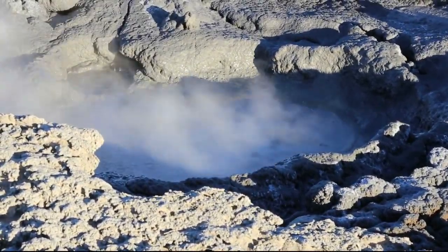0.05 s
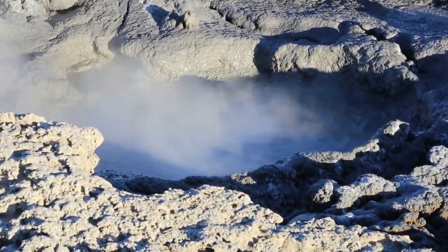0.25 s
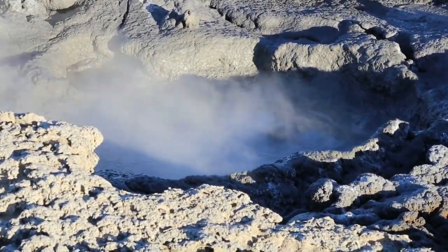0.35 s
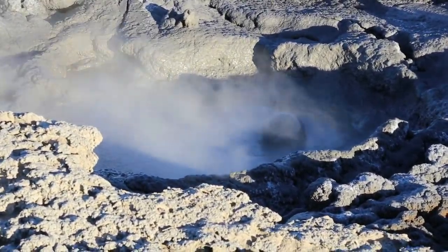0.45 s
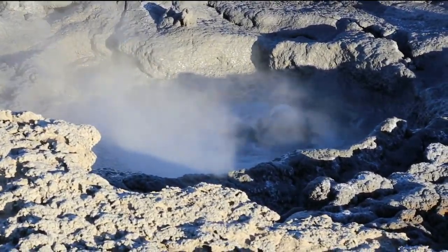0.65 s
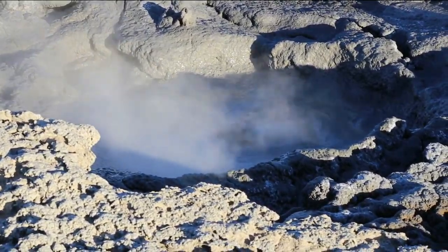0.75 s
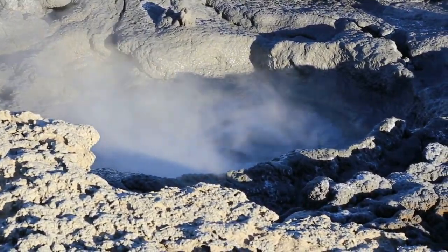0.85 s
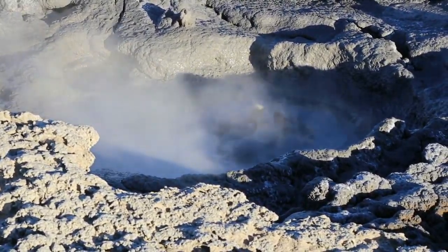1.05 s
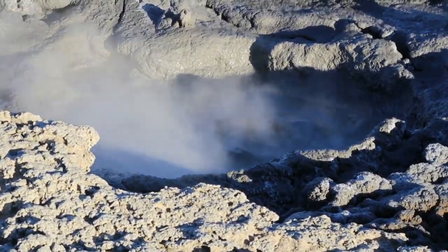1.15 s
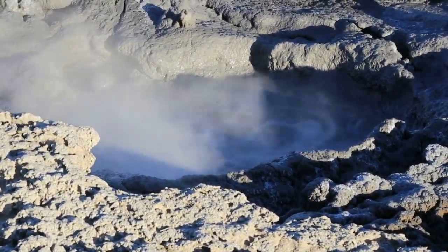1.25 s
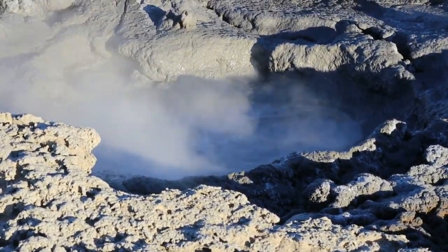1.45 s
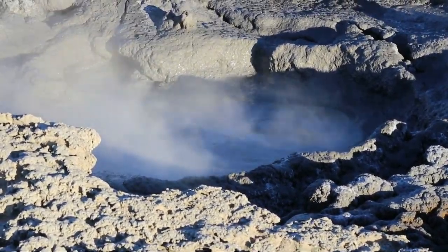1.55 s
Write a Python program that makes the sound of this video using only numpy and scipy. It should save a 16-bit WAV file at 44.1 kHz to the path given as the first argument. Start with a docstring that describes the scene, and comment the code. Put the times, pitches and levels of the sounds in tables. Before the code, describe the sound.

Thick mud bubbling with irregular plops and wet pops over steady rushing steam.

```python
"""Thick mud churns and simmers in a rocky outdoor pit, over rushing steam and a little wind rumble.
Small bubbles snap open as their films tear, with wet ticks that echo off the pit walls.
Large gas pockets glug under the surface, their pitch rising as they near it.
Thrown mud spatters back, and tearing films crackle with fine spray."""
import sys
import numpy as np
from scipy import signal
from scipy.fft import rfft, irfft
from scipy.io import wavfile

SR = 44100
rng = np.random.default_rng(int(sys.argv[2]) if len(sys.argv) > 2 else 0)


def pcm_store(signal):
    """Save signal as 16-bit PCM."""
    levels = np.round(np.clip(np.atleast_2d(signal), -1, 1) * 32767)
    wavfile.write(sys.argv[1], SR, levels.astype(np.int16).T)


N = 70560
T = np.arange(N) / SR
BUBBLE_RISE_PER_S = 2.8  # relative pitch rise of a surfacing bubble


def from_db(db):
    """Decibels to gain."""
    return 10 ** (np.asarray(db) / 20)


def level(curve):
    """Gain over time from (time [s], level [dB]) points."""
    return from_db(np.interp(T, *np.transpose(curve)))


def rms_one(x):
    """Scale to rms 1."""
    return x / np.sqrt(np.mean(x ** 2) + 1e-20)


def add(out, start_s, sound):
    """Mix a sound in at start_s."""
    i = int(np.clip(start_s * SR, 0, N - 1))
    out[i:i + len(sound)] += sound[:N - i]


def band(x, low_hz, high_hz, order=2):
    """Butterworth band-pass."""
    return signal.sosfilt(signal.butter(order, [low_hz, high_hz], "band", fs=SR, output="sos"), x)


def drift(rate_hz):
    """Slow random wander, rms 1."""
    hz = np.arange(N // 2 + 1) * SR / N
    return rms_one(irfft(rfft(rng.standard_normal(N)) / (1 + (hz / rate_hz) ** 2), N))


def bubble(hz, swell_s, t60_s):
    """A gas cavity swells into a ring and decays while its pitch rises."""
    t = T[:SR // 4]
    envelope = (1 - np.exp(-(t / swell_s) ** 2)) * from_db(-60 * t / t60_s)
    return envelope * np.sin(2 * np.pi * hz * t * (1 + BUBBLE_RISE_PER_S * t / 2))


def swarm(per_s, range_hz, t60_cycles, spread_db, tilt_db, pitches=18):
    """Random bubbles of uneven strength on log-spaced pitches, tilted from low to high; rms 1."""
    strengths = from_db(spread_db * np.minimum(rng.exponential(1, N), 4))
    signs = rng.choice([-1, 1], N)
    births = rng.random(N) < per_s / SR
    kicks = strengths * signs * births
    pitch_index = rng.integers(0, pitches, N)
    out = np.zeros(N)
    for k, hz in enumerate(np.geomspace(*range_hz, pitches)):
        ring = bubble(hz, swell_s=0.88 / hz, t60_s=t60_cycles / hz)
        out += from_db(tilt_db * k / pitches) * signal.fftconvolve(kicks * (pitch_index == k), ring)[:N]
    return rms_one(out)


def pool():
    """Large bubbles churn deep down; small ones simmer all over the pool."""
    churn = swarm(per_s=560, range_hz=(116.3, 319.6), t60_cycles=11.6, spread_db=0.5, tilt_db=10.5)
    simmer = swarm(per_s=800, range_hz=(475, 1600), t60_cycles=6.5, spread_db=4, tilt_db=-3)
    return from_db(-47) * churn + from_db(-51.5) * simmer


def spatter():
    """Thrown mud falls back, ringing as tiny bubbles."""
    # spatter after the bursts: (time [s], level [dB])
    surges = [(0, -51), (.1, -50), (.19, -51), (.31, -49), (.41, -48), (.47, -52.5), (.61, -51), (.70, -43),
              (.80, -45.5), (.90, -52), (1.19, -51.5), (1.26, -46.5), (1.34, -52), (1.6, -55)]
    drops = swarm(per_s=3500, range_hz=(1125, 4600), t60_cycles=5.1, spread_db=3.5, tilt_db=1)
    return level(surges) * band(drops, low_hz=475, high_hz=5250, order=6)


def steam_and_wind():
    """Dull noise bands flicker independently under a smooth hiss; gusts swell the lowest."""
    # steam and wind spectrum: (frequency [Hz], relative density [dB])
    spectrum = [(25, -50), (50, -12.5), (85, -3), (150, -1), (230, 1), (410, -8), (610, -5.5), (900, -13),
                (1400, -22.5), (2200, -25), (3600, -29.5), (5100, -28.5), (5800, -36), (7100, -41),
                (12200, -38.5), (16000, -43.5)]
    # gusts in the wind rumble: (time [s], gain [dB])
    gusts = [(0, 5), (.2, -6.5), (.37, 1.5), (.45, -0.5), (.75, 2), (1.1, 0.5), (1.35, 4), (1.6, 1.5)]
    flicker_db, wind_top_hz = 1.14, 160
    edges_hz = [12, 80, 160, 320, 640, 1280, 2560, 5120]
    hz = np.arange(N // 2 + 1) * SR / N + 1
    knots_hz, knots_db = np.transpose(spectrum)
    shape = from_db(np.interp(np.log(hz), np.log(knots_hz), knots_db))
    noise_bins = rfft(rng.standard_normal(N)) * shape
    out = irfft(noise_bins * (hz >= edges_hz[-1]), N)  # smooth hiss
    for low_hz, high_hz in zip(edges_hz, edges_hz[1:]):
        flicker = from_db(flicker_db * drift(rate_hz=13))
        gust = level(gusts) if high_hz <= wind_top_hz else 1
        out += irfft(noise_bins * (hz >= low_hz) * (hz < high_hz), N) * flicker * gust
    return from_db(-42) * rms_one(out)


def pops():
    """A bubble's film tears; as the hole widens, the pitch shoots up and the ring dies ever faster."""
    # bubbles snapping open: (time [s], pitch [Hz], level [dB], life to -60 dB [cycles])
    bursts = [(0.0093, 2010, -30.5, 4.8), (0.0335, 2680, -33.5, 9.7), (0.0335, 925, -30, 3.8),
              (.098, 590, -33, 7.8), (.1425, 1300, -33, 5.7), (0.222, 1360, -30.5, 3.4),
              (.3385, 1060, -35, 10), (.338, 583, -30.5, 3.8), (0.3392, 2720, -33.5, 17),
              (0.3978, 680, -26, 3.9), (.4035, 1090, -24, 2.5), (0.4091, 750, -30.5, 8.8),
              (0.434, 2840, -26.5, 10), (0.434, 4050, -33.5, 16), (.4330, 584, -29, 4.4),
              (0.5931, 2440, -24.5, 3.2), (0.6388, 1600, -30, 16), (0.6398, 2160, -25.5, 19.6),
              (.6402, 3070, -25.5, 8.8), (.6665, 630, -27, 4.9), (0.694, 620, -33, 7),
              (0.7562, 3260, -28, 7.2), (0.7575, 570, -24, 5.8), (0.7589, 1320, -22.5, 4.7),
              (0.7736, 2650, -21, 3), (.7769, 2220, -13.5, 5.5), (.7800, 587, -26.5, 4),
              (0.781, 4600, -22, 6.9), (0.8032, 1980, -22, 3.5), (.8034, 1720, -20.5, 5.6),
              (0.819, 1730, -33, 11), (.8805, 3000, -35, 6), (0.9862, 1280, -33.5, 6.5),
              (0.9952, 940, -42, 7), (.9970, 573, -32.5, 7.7), (1.1050, 670, -31.5, 6),
              (1.1718, 2258, -3, 7.5), (1.2080, 930, -24.5, 4.6), (1.241, 1020, -34, 11),
              (1.271, 2360, -34.5, 22), (1.3129, 2940, -32, 3.6), (1.4099, 800, -29, 2.4),
              (1.445, 550, -32.5, 3.9), (1.5258, 780, -33.5, 9.5), (1.5377, 2710, -28.5, 3.1)]
    open_cycles, torn_cycles, rise_per_life = 0.36, 9.6, 0.9
    out, t = np.zeros(N), T[:SR // 20]
    for start_s, hz, db, life_cycles in bursts:
        age = t * hz / life_cycles
        envelope = (1 - np.exp(-(t * hz / open_cycles) ** 2)) * from_db(-60 * age ** 2)
        rise = rise_per_life * min(1, torn_cycles / life_cycles) ** 2  # long rings tear and rise less
        pitch_hz = hz * (1 + rise * (np.minimum(age, 1) - 1 / 4))
        add(out, start_s, from_db(db) * envelope * np.sin(2 * np.pi * np.cumsum(pitch_hz) / SR))
    return out


def pit(x):
    """Direct sound, close wall reflections and a short, faint scatter off rough rock."""
    # wall reflections: (delay [s], gain [dB])
    walls = [(.0019, -19.5), (.00327, -12.5), (.00528, -13.5), (.00624, -17.5), (.00671, -15), (0.01, -16)]
    scatter_db, scatter_t60_s = -25, 0.27
    out, t = x.copy(), T[:SR // 4]
    for delay_s, db in walls:
        out += from_db(db) * np.interp(T - delay_s, T, x, left=0)
    scatter = rng.standard_normal(len(t)) * from_db(-60 * t / scatter_t60_s)
    return out + from_db(scatter_db) * signal.fftconvolve(x, scatter / np.linalg.norm(scatter))[:N]


def glugs():
    """Large pockets swell into a low ring that the mud soon damps; pitch rises as they surface."""
    # gas pockets: (time [s], pitch [Hz], peak [dB], swell [s])
    pockets = [(0.047, 112, -42, 0.012), (0.226, 193, -26.5, 0.017), (0.261, 231, -35, .013),
               (.287, 227, -20, .013), (.303, 305, -34.5, 0.014), (.393, 194, -37, 0.017),
               (.416, 135, -31.5, 0.012), (0.445, 177, -26, 0.0051), (.481, 224, -28, 0.005),
               (.500, 198, -39.5, .018), (.756, 336, -24, 0.0034), (.7775, 238, -24.5, .0105),
               (0.968, 310, -33.5, 0.0066), (1, 200.7, -37.5, 0.015), (1.086, 223.5, -34.5, 0.019),
               (1.114, 199, -33, 0.019), (1.258, 185, -33.5, .011), (1.298, 208.4, -35.5, 0.015),
               (1.415, 258, -31.5, 0.0038), (1.439, 233, -34.5, .01)]
    out, t = np.zeros(N), T[:SR // 8]
    for start_s, hz, peak_db, swell_s in pockets:
        swell = (t / swell_s) ** 2
        envelope = from_db(peak_db) * swell * np.exp(1 - swell)
        add(out, start_s, envelope * np.sin(2 * np.pi * hz * t * (1 + BUBBLE_RISE_PER_S * t / 2)))
    return out


def ticks():
    """A film tears or a drop lands: a tiny, bright noise burst."""
    # wet ticks: (time [s], level [dB], band centre [Hz], t60 [s])
    tears = [(0.222, -41, 3100, 0.028), (0.4084, -39.5, 3140, 0.017), (.428, -46, 3530, .04),
             (0.6665, -36.5, 3200, 0.014), (0.688, -56, 8000, 0.038), (0.7123, -31, 3860, 0.003),
             (0.714, -48, 9100, 0.0077), (0.7358, -42, 6200, 0.0018), (.7488, -41, 6500, 0.0015),
             (.7805, -46, 7200, 0.004), (.846, -34, 3100, 0.0022), (1.1715, -33.5, 4700, 0.0016),
             (1.2115, -46, 6100, 0.0042), (1.236, -44, 4300, 0.012), (1.260, -49, 5540, 0.012),
             (1.412, -37, 2280, 0.0048)]
    edge_ratio = 1.3
    out, t = np.zeros(N), T[:SR // 10]
    for start_s, db, hz, t60_s in tears:
        envelope = from_db(db - 60 * t / t60_s)
        burst = band(rng.standard_normal(len(t)), hz / edge_ratio, hz * edge_ratio) * envelope
        add(out, start_s, burst * np.linalg.norm(envelope) / np.linalg.norm(burst))
    return out


def spray():
    """The finest droplets crackle while a mud film stretches and tears."""
    # droplet clouds: (centre [s], length [s], level [dB])
    clouds = [(0.699, 0.046, -50.5), (0.794, 0.045, -58.5), (1.25, 0.04, -52.5)]
    envelope = np.zeros(N)
    for centre_s, length_s, db in clouds:
        envelope += from_db(db) * np.exp(-(2 * (T - centre_s) / length_s) ** 2)
    droplets = swarm(per_s=3700, range_hz=(3200, 10900), t60_cycles=5.6, spread_db=3.5, tilt_db=-21)
    return envelope * droplets


def scene():
    """Bursts in the pit over the simmering pool, steam and wind; mono."""
    return (pit(pops() + ticks()) + glugs() + spray() + pool() + spatter() + steam_and_wind())[None]


def record(dry):
    """Steep elliptic low-pass."""
    cutoff_hz = 15900
    return signal.sosfilt(signal.ellip(10, .1, 70, cutoff_hz, fs=SR, output="sos"), dry)


dry = scene()
out = record(dry)
pcm_store(out)
```